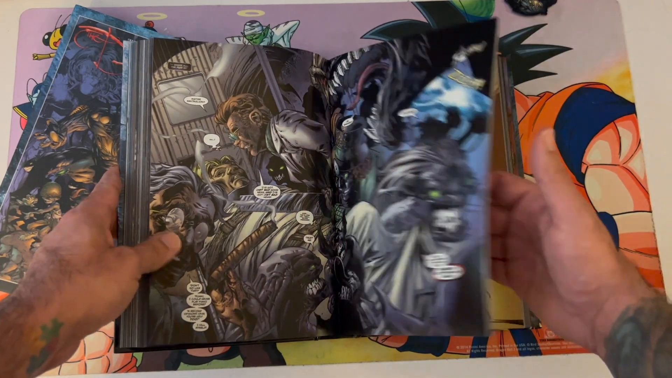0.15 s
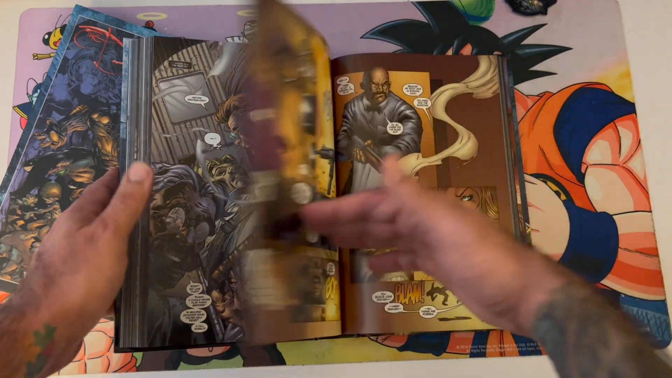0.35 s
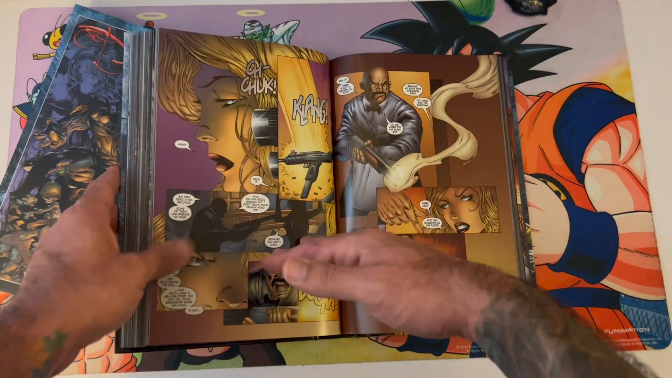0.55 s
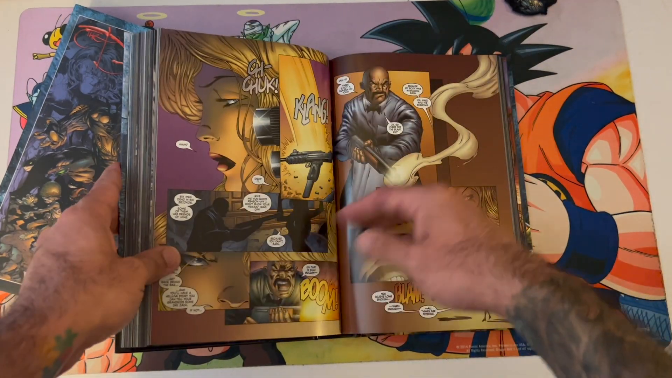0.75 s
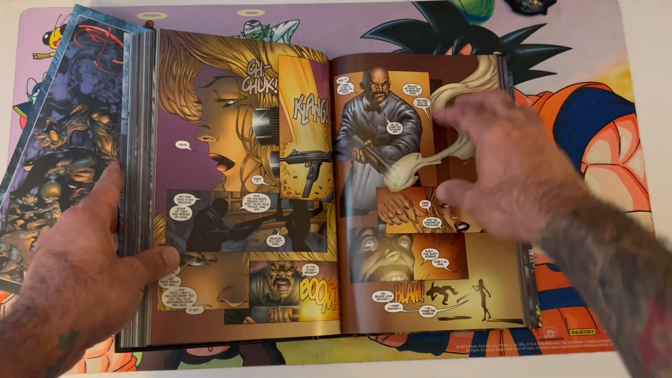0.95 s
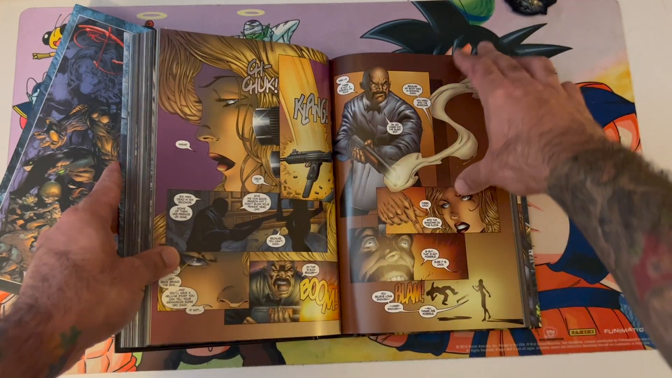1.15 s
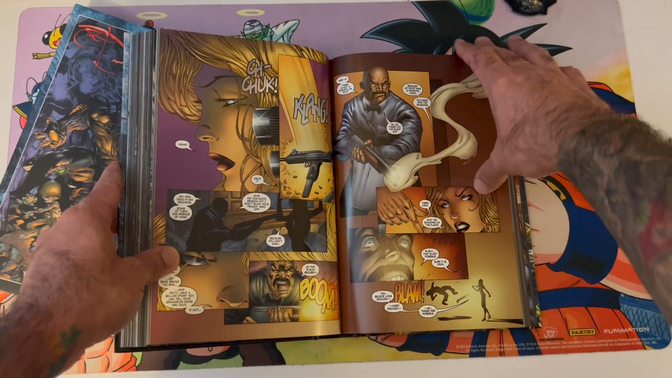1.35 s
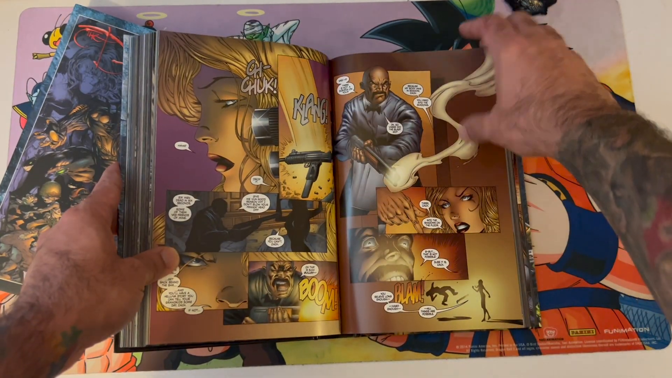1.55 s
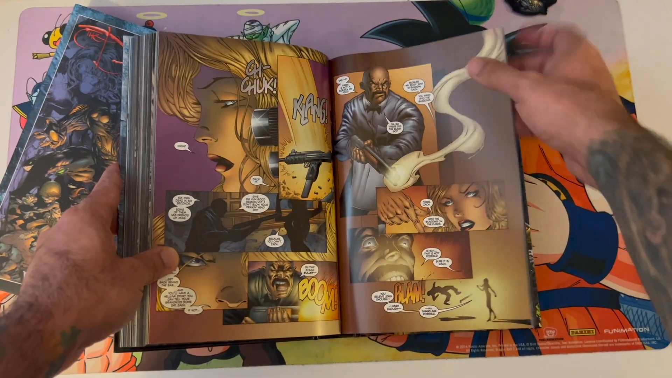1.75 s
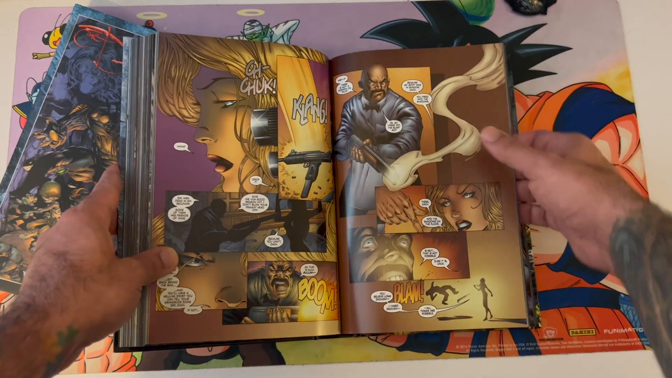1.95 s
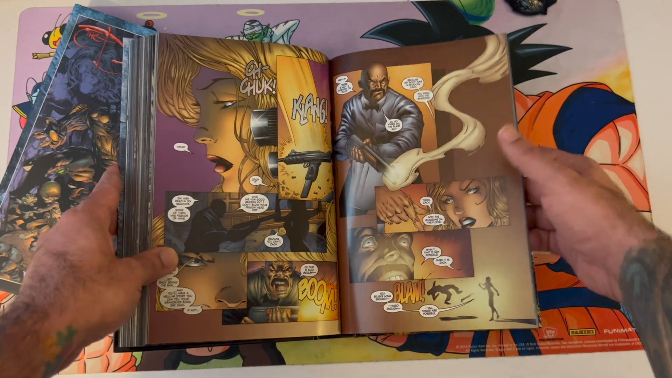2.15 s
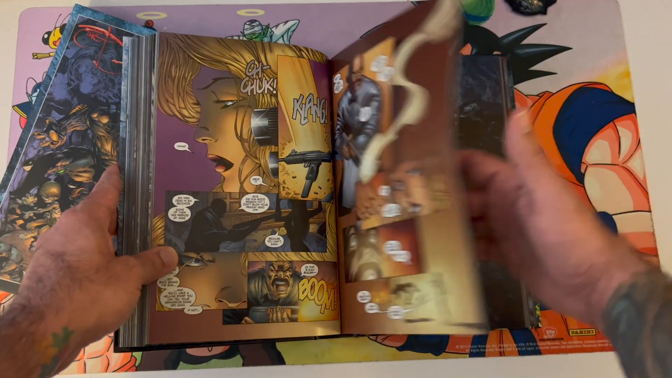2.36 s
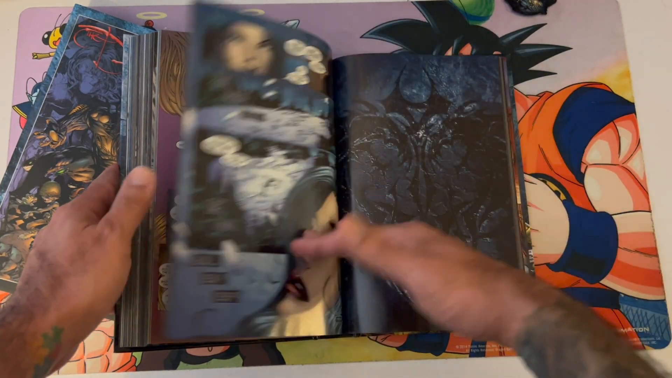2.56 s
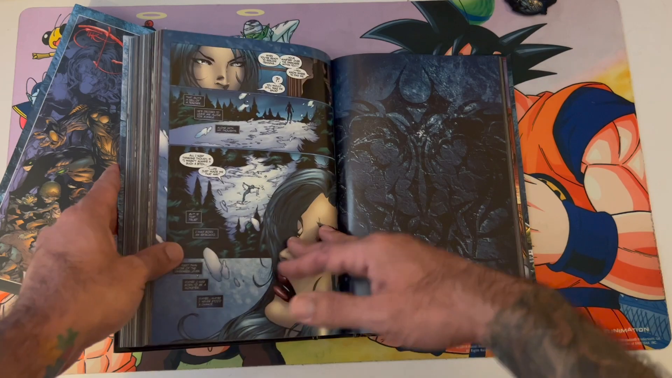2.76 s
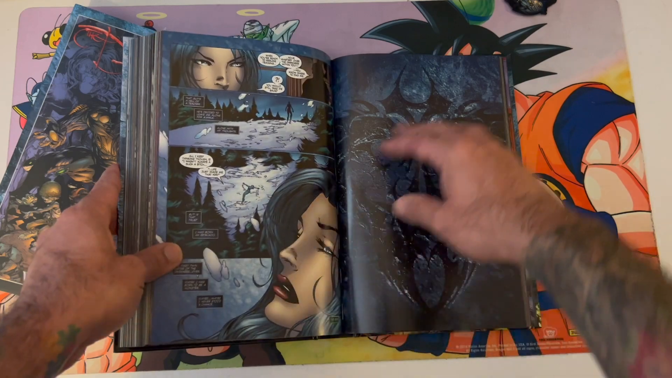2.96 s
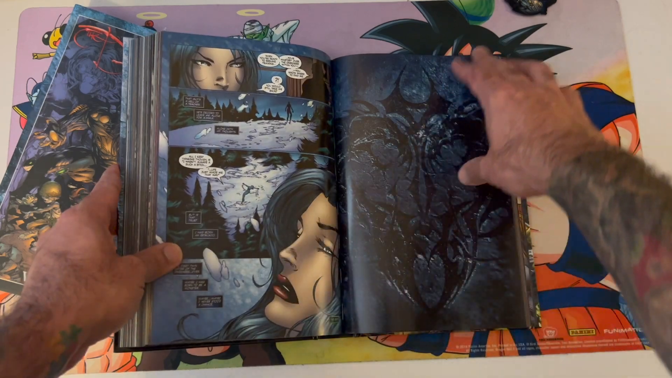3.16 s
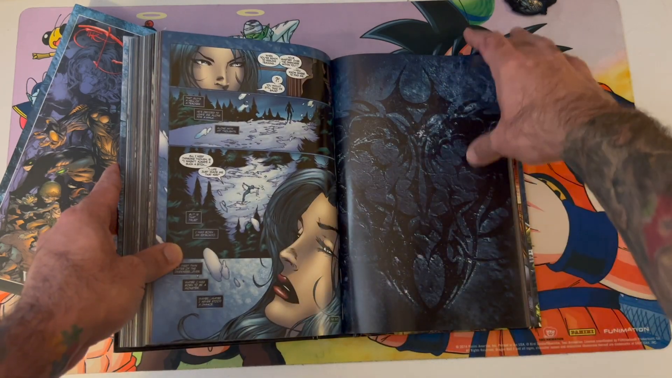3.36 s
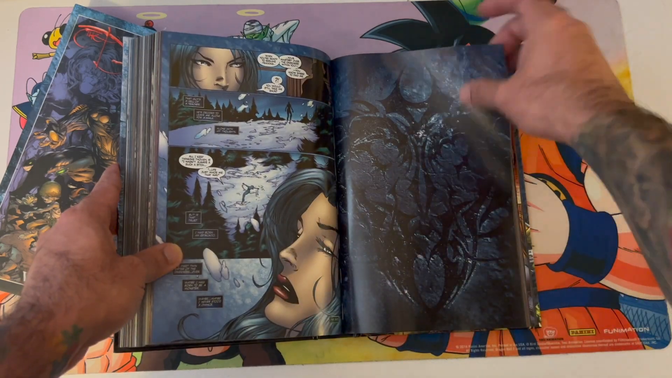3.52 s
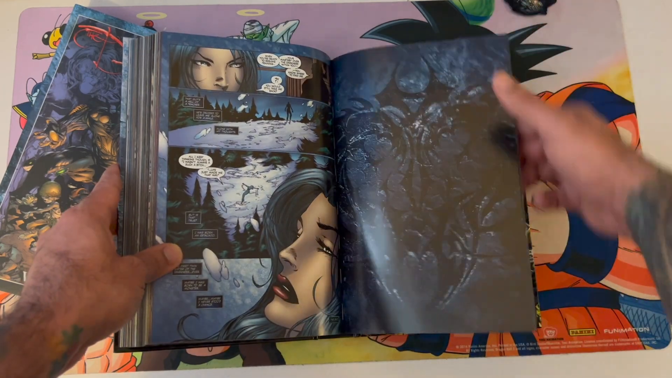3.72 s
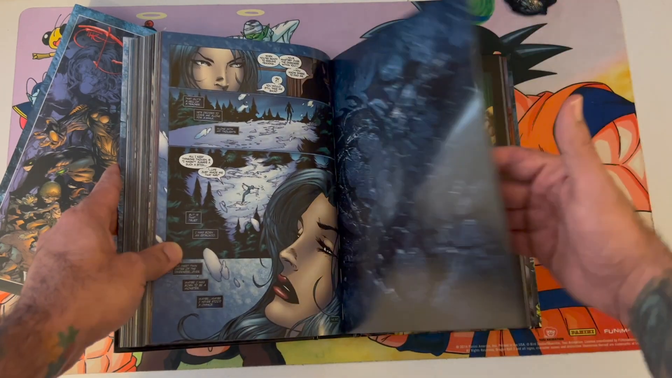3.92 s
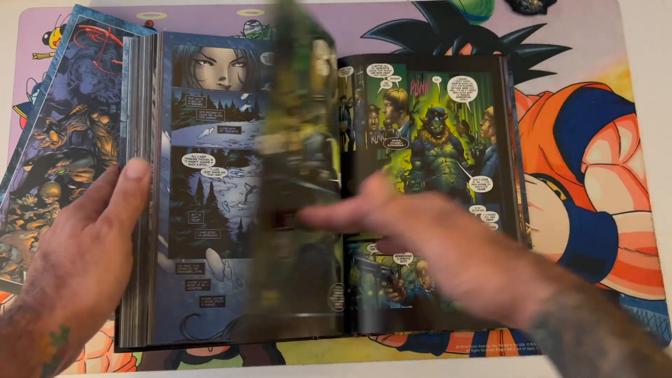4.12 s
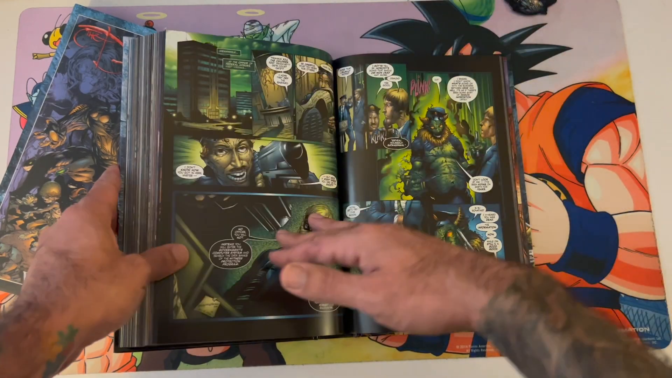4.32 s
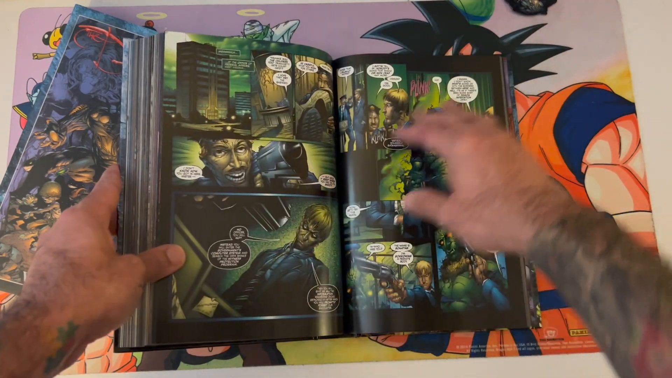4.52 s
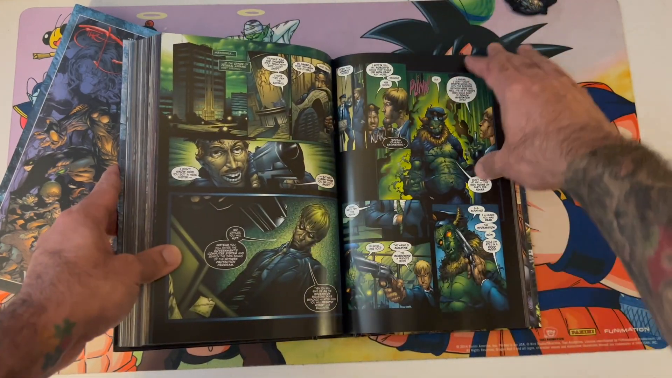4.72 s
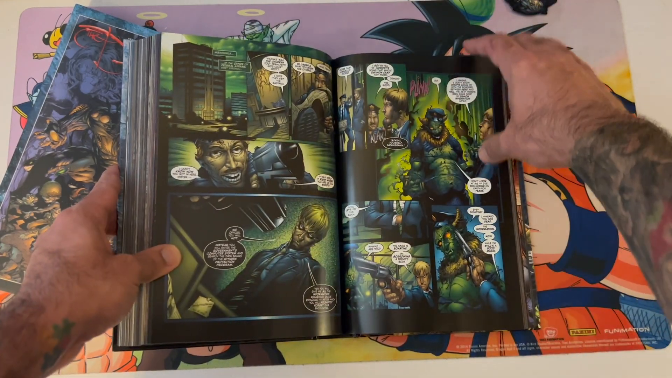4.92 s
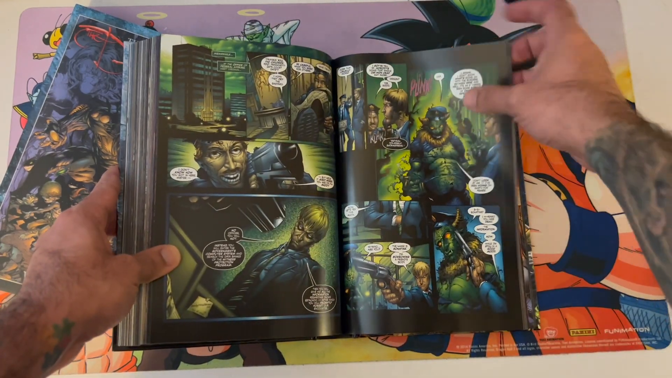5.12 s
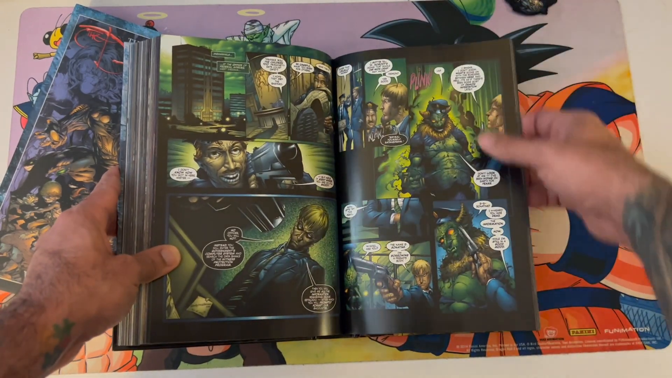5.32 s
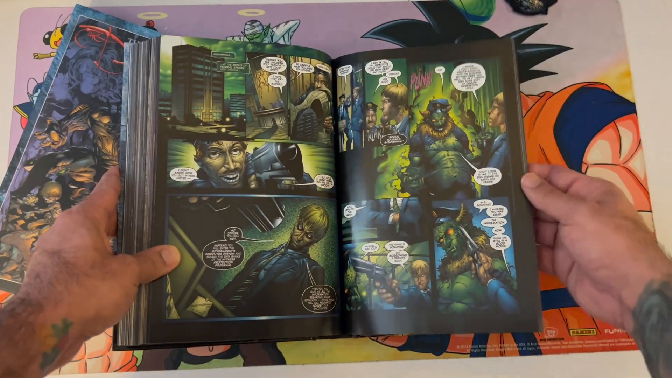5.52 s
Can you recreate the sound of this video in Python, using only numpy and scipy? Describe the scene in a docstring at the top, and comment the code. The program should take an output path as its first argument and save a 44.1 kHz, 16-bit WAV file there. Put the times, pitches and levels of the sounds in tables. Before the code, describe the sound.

Three glossy pages of a hardcover book are turned in a quiet room, with dull buckling pops, soft hand rubs and sharp slaps.

```python
"""Three glossy pages of a hardcover book are turned on a table in a small quiet room.
At once a hand rubs and the first sheet buckles in dull pops, with thumps by half a second.
More pops lead to a cluster of slaps near 2.6 s; a rasp at 3.65 s and pops lead to one hard slap at 4.2 s.
Slides, edge ticks and faint pops close it. Pops and slaps are dispersed bending waves, thumps are damped
modes, and the slides, ticks and swishes are shaped noise; a short room answers all but the slides."""
import sys
import numpy as np
from scipy import signal
from scipy.fft import rfft, irfft, next_fast_len
from scipy.io import wavfile
from scipy.ndimage import map_coordinates

SR = 44100
rng = np.random.default_rng(int(sys.argv[2]) if len(sys.argv) > 2 else 0)


def wav_record(signal):
    """Record a signal, one row per channel, as 16-bit PCM in the file named by sys.argv[1]."""
    frames = np.transpose(np.atleast_2d(signal))
    bounded = np.clip(frames, -1, 1)
    # unit amplitude maps onto the largest positive 16-bit level
    quanta = np.round(bounded * 32767).astype(np.int16)
    wavfile.write(sys.argv[1], SR, quanta)


N = 250558

# Spectrum of a buckling sheet, also used for the grit. Each row: frequency in Hz, relative level in dB per Hz.
BUCKLE_SPECTRUM = [(60, -3), (250, -6), (480, 3.5), (850, 4.5), (1100, -5), (1500, -4.5), (2200, -15),
                   (2900, -20), (4000, -32), (9000, -60), (16000, -86)]
# Spectrum of slipping page edges and paper skids. Each row: frequency in Hz, relative level in dB per Hz.
EDGE_SPECTRUM = [(200, -21.5), (1000, -2.5), (2000, 1), (3500, 0.5), (5500, -0.5), (8500, 4), (12000, -3),
                 (16000, -6)]


def amp(db):
    """Decibels to a linear gain."""
    return 10 ** (np.asarray(db) / 20)


def unit(x):
    """Scaled to rms 1."""
    return x / np.sqrt(np.mean(x ** 2) + 1e-20)


def along(points, hz):
    """Read a curve of (Hz, value) points on a log frequency axis."""
    f, v = np.transpose(points)
    return np.interp(np.log(hz + 1), np.log(f + 1), v)


def wobble(rate):
    """A smooth random curve with rate knots a second."""
    knots = rng.standard_normal(int(N * rate / SR) + 4)
    return map_coordinates(knots, [np.arange(N) * rate / SR])


def add(track, s, sound):
    """Mix a sound in at time s in seconds."""
    start = max(round(s * SR), 0)
    part = sound[..., :N - start]
    track[..., start:start + part.shape[-1]] += part


def tilted(spectrum, hz, tilt_db):
    """Gain of a spectrum with a tilt in dB per octave above 500 Hz."""
    return along(spectrum, hz) + tilt_db * np.log2(np.maximum(hz, 500))


def noise(spectrum, n, tilt_db=0, shift=1, ring_hz=1000, ring_db=0, ring_width=0.035, edge_hz=0):
    """Stereo noise of rms 1 with a tilt, one resonance, a low edge and a width that varies with frequency."""
    # Likeness of the two sides. Each row: frequency in Hz, likeness (1 is identical).
    likeness = [(60, 0.93), (300, .89), (700, 0.21), (2000, 0.68), (6000, 0.42), (14000, 1)]
    size = next_fast_len(n)
    hz = np.fft.rfftfreq(size, 1 / SR)
    resonance_db = ring_db / (1 + ((hz / ring_hz - 1) / ring_width) ** 2)
    tilt = tilt_db * np.log2(np.maximum(hz, 500))
    gain = amp(along(spectrum, hz / shift) + resonance_db + tilt)
    gain = gain / np.sqrt(1 + (edge_hz / (hz + 1)) ** 10)
    turn = np.arccos(along(likeness, hz)) / 2
    phases = np.exp(2j * np.pi * rng.random((2, len(hz))))
    mid, side = irfft(phases * gain * [np.cos(turn), np.sin(turn)], size)[:, :n]
    return unit(np.array([mid + side, mid - side]))


def burst(spectrum, rise, fall, size=4096, **colour):
    """Noise like a crowd of tiny paper snaps: it swells for rise seconds, then dies at 60 dB per fall seconds."""
    t = np.arange(size) / SR
    shape = np.minimum(t / rise, 1) ** 2 * amp(-60 * np.maximum(t - rise, 0) / fall)
    return unit(shape * noise(spectrum, size, **colour)) * np.sqrt(np.mean(shape ** 2))


def ring(modes):
    """Damped modes (Hz, dB, t60 in seconds), struck at slightly new strengths and pitches."""
    t = np.arange(SR // 2) / SR
    scatter_db, detune = 1.5, .012  # detune is a share of the pitch
    out = np.zeros(len(t))
    for hz, db, t60 in modes:
        decay = amp(db + scatter_db * rng.normal() - 60 * t / t60)
        out += decay * np.cos(2 * np.pi * hz * (1 + detune * rng.normal()) * t)
    return out


def bend(spectrum, glide_s, tilt_db, ring_hz, ring_db, ring_width=0.042, right_lag_s=.00006, size=4096):
    """A bending wave in the sheet, peak 1: treble arrives first and bass last, so the knock drops in pitch."""
    crease_hz, crease_cycles = 445, 0.18  # spacing and depth of the scatter from an uneven sheet
    hz = np.fft.rfftfreq(size, 1 / SR)
    gain = amp(tilted(spectrum, hz, tilt_db))
    resonance = 1 + (amp(ring_db) - 1) / (1 + 1j * (hz / ring_hz - 1) / ring_width)
    # this phase delays 1 kHz by glide_s, and lower pitches by more
    cycles = 2 * glide_s * np.sqrt(1000 * hz) + rng.random()
    cycles = cycles + crease_cycles * map_coordinates(rng.standard_normal(size), [hz / crease_hz])
    lag = right_lag_s * hz * np.array([[0], [1]])
    wave = irfft(gain * resonance * np.exp(-2j * np.pi * (cycles + lag)), size)[:, :size // 2]
    return wave / np.abs(wave).max()


def buckling(count=5):
    """The bent sheet gives way in a quick run of dull pops, each with its own ring pitch, and flutters on."""
    # Each row: start in seconds, relative level in dB, length of the run of pops in seconds,
    # centre of the ring pitches in Hz, tilt in dB per octave.
    buckles = [(.0685, -29.5, 0.0031, 1420, 6), (.076, -44, 0.0048, 1300, -6),
               (.119, -35, 0.0042, 1580, 2.5), (.126, -36.5, 0.0043, 1400, -11),
               (.136, -40.5, 0.0063, 1280, 0), (.280, -40, 0.0034, 1320, -4), (0.406, -42, .008, 1290, 2),
               (0.416, -33, 0.014, 1650, 1), (.444, -28.5, 0.0093, 1730, 1.5),
               (.451, -29.5, 0.012, 1070, 1), (.454, -32, 0.0067, 2560, 6), (.461, -39, 0.0053, 595, -12),
               (.471, -46, 0.01, 1400, -3), (.479, -35.5, 0.0057, 2600, 3), (.485, -40, .011, 1050, 1),
               (.506, -42, .012, 1200, -1), (.565, -46, 0.0069, 1070, 4), (1.612, -52, 0.0026, 2400, 13),
               (1.672, -45, .003, 1910, 8), (1.822, -49.5, .012, 1590, 8), (1.852, -51, 0.018, 1100, 2),
               (1.871, -43.5, .008, 1450, 5), (2.125, -55.5, 0.0034, 1400, 2),
               (2.271, -38.5, 0.0039, 1440, -1.5), (2.279, -39.5, 0.011, 1290, -13),
               (2.297, -46.5, 0.0092, 1440, -4), (2.423, -42, 0.0075, 1310, -11.5),
               (2.465, -44, .01, 1290, -15), (3.716, -44, .016, 1210, -2), (3.742, -45, .005, 1160, 4),
               (3.748, -35, 0.0047, 1160, 2.5), (3.756, -34.5, 0.0083, 1560, 3.5),
               (3.767, -42, 0.0052, 1160, 0), (3.834, -40.5, 0.0061, 1810, 1),
               (3.94, -39.5, .012, 1400, -10), (3.957, -46, .008, 2000, -6),
               (4.032, -34.5, 0.0079, 1280, -4), (4.069, -44.5, 0.0035, 1170, -2),
               (5.185, -50, 0.016, 1300, 4), (5.207, -45.5, .009, 1580, 2.5),
               (5.258, -47.5, 0.0094, 2060, 1.5), (5.654, -50.5, .005, 1420, 1)]
    glide_s, pop_ring_db = 0.002594, 10  # bending-wave delay at 1 kHz
    fade_db = 5  # drop in level across a run
    pitch_scatter = 0.16  # as a share of the ring pitch
    flutter_rise_s, flutter_fall_s, flutter_db = 0.01, 0.052, -17
    out = np.zeros((2, N))
    for s, db, length, ring_hz, tilt_db in buckles:
        for k in range(count):
            place = (k + rng.random()) / count
            pitch_hz = ring_hz * np.exp(pitch_scatter * rng.normal())
            gain = amp(db + fade_db * (.5 - place)) / np.sqrt(count)
            pop = bend(BUCKLE_SPECTRUM, glide_s, tilt_db, pitch_hz, pop_ring_db)
            add(out, s + place * length, gain * pop)
        flutter = burst(BUCKLE_SPECTRUM, flutter_rise_s, flutter_fall_s, tilt_db=tilt_db - 4)
        add(out, s, amp(db + flutter_db) * flutter)
    return out


def slapping():
    """The sheet smacks down on the stack, in one piece or in several quick contacts, as bending waves."""
    # Each row: start in seconds, relative level in dB, delay of the bending wave at 1 kHz in seconds,
    # tilt in dB per octave, ring in Hz, ring height in dB.
    slaps = [(2.592, -39, .003, 2.5, 1810, 20), (2.597, -29.5, .0035, 1, 1670, 26),
             (2.601, -28, .003, -1.5, 1460, 21), (2.607, -27.5, 0.002947, 4, 2940, 28),
             (2.616, -43, .003, 6, 2400, 22), (2.622, -42, .003, -1, 1780, 15),
             (2.636, -43, .003, 4, 2750, 20), (2.654, -48, .003, 3, 1560, 29),
             (4.2116, -19.5, 0.0062, -0.5, 5200, 9)]
    # Spectrum of a smack. Each row: frequency in Hz, relative level in dB per Hz.
    slap_spectrum = [(60, -25), (170, -6.5), (340, -6.5), (430, -4.5), (550, -14.5), (720, 3), (870, 0),
                     (1100, -10.5), (1700, -20), (3000, -21), (4500, -19.5), (8500, -23.5), (16000, -38)]
    out = np.zeros((2, N))
    for s, db, glide_s, tilt_db, ring_hz, ring_db in slaps:
        add(out, s, amp(db) * bend(slap_spectrum, glide_s, tilt_db, ring_hz, ring_db))
    return out


def thumping():
    """Blows on the block of pages: a soft one mostly wakes its low modes, and each squeezes out a puff of air."""
    # Each row: start in seconds, relative level in dB, hardness as a low-pass cutoff in Hz,
    # puff relative to the knock in dB.
    thumps = [(0.139, -44.5, 450, 0), (.298, -43, 219, -20), (.463, -39, 448, -10), (.482, -39.5, 330, -3),
              (1.831, -44.5, 250, -6), (2.31, -48, 197, -8), (2.608, -35.5, 460, -10),
              (2.879, -52, 303, -6), (3.58, -48.5, 403, -3), (3.75, -52, 397, -7), (4.048, -46, 300, -8),
              (4.221, -32, 450, -4.5), (4.475, -50, 221, -14)]
    # Modes of the book. Each row: frequency in Hz, relative level in dB, 60 dB decay time in seconds.
    book_modes = [(59.3, -18, 0.23), (112.5, -9.5, 0.17), (172, -9, 0.025), (330, 1, 0.055),
                  (410, -5, 0.051), (687, 5, 0.0081), (870, -15, 0.0055)]
    puff_hz = 69  # the cushion of air squeezed from under the sheet
    out = np.zeros(N)
    cycles = np.arange(SR // 10) / SR * puff_hz
    puff = np.sin(2 * np.pi * cycles) * 2 * cycles * np.exp(1 - 2 * cycles)
    for s, db, hard_hz, puff_db in thumps:
        add(out, s, amp(db + puff_db) * puff)
        softness = signal.butter(2, hard_hz, fs=SR)
        add(out, s, amp(db) * signal.lfilter(*softness, ring(book_modes)))
    lowest_hz = 55  # the book is too small to radiate deep bass
    out = signal.sosfilt(signal.butter(3, lowest_hz, "high", fs=SR, output="sos"), out)
    # pages land on the left, so the right side hears them later
    lag = round(.00014 * SR)
    return np.array([out, np.pad(out, (lag, 0))[:N]])


def swishing():
    """Paper skids on paper or skin in tiny jerks: ringing noise that is loudest as the two meet."""
    # Each row: moment of meeting in seconds, relative level in dB, rise in seconds, fall in seconds,
    # ring in Hz, ring height in dB, tilt in dB per octave.
    swishes = [(.49, -49.5, .03, 0.12, 12300, -7, 1), (.53, -61.5, .42, 1, 4180, 15, -8.5),
               (2.606, -33.5, .02, 0.024, 2050, 8.5, -11.5), (2.643, -45.5, 0.01, 0.11, 12200, 0, 11),
               (1.835, -57, 0.039, 0.28, 2800, 3, -4), (2.895, -58.5, 0.037, 0.09, 1960, 10, 1.5),
               (4.107, -47.5, 0.032, 0.2, 12000, 3, 1.5), (4.12, -39, 0.0066, 0.022, 1720, 5, -3),
               (4.219, -42, 0.0044, 0.053, 5040, -7, -6.5)]
    out = np.zeros((2, N))
    for s, db, rise, fall, ring_hz, ring_db, tilt_db in swishes:
        skid = burst(EDGE_SPECTRUM, rise, fall, size=40000, tilt_db=tilt_db,
                     ring_hz=ring_hz, ring_db=ring_db, ring_width=0.077)
        add(out, s - rise, amp(db) * skid)
    jerks = unit(amp(0.61 * wobble(700)))
    return out * jerks


def rasping():
    """A fingertip catches the page edge and scrapes along it in jerks: noise read ever slower sinks in pitch."""
    # Spectrum of the scrape. Each row: frequency in Hz, relative level in dB per Hz.
    rasp_spectrum = [(400, -21), (1300, -9.5), (2200, -6), (2900, -0.5), (4250, 5), (4800, -33),
                     (9000, -30), (16000, -26)]
    start_s, rasp_db, rasp_fall_s = 3.647, -54.5, 0.38
    catch_db, catch_rise_s, catch_fall_s = -31.5, .002, 0.018  # the catch that starts the rasp
    sag_per_s = 2.1  # exponential rate of the slowing
    out, t = np.zeros((2, N)), np.arange(SR // 4) / SR
    travel = np.cumsum(np.exp(-sag_per_s * t))
    scrape = np.array([map_coordinates(side, [travel]) for side in noise(rasp_spectrum, 2 * len(t))])
    jerks = unit(amp(2.5 * wobble(337)))[:len(t)]
    level = amp(catch_db - 60 * t / catch_fall_s) + jerks * amp(rasp_db - 60 * t / rasp_fall_s)
    add(out, start_s, np.minimum(t / catch_rise_s, 1) * level * scrape)
    return out


def ticking():
    """Page edges slip off a fingertip or off each other: short bright bursts with a slightly varied ring."""
    # Each row: start in seconds, relative level in dB, tilt in dB per octave.
    ticks = [(0.0365, -53, -5.5), (.161, -42, -5.5), (.343, -49.5, 18.5), (0.43, -46, 8), (.439, -43, 7),
             (.467, -40, 8), (0.487, -35.5, 9), (.494, -40, 8), (0.5213, -49, 0), (0.566, -44, 2),
             (1.613, -56, -4.5), (1.653, -51, -7), (1.6727, -43.5, -10), (1.678, -50, -14),
             (1.692, -56, -7), (1.831, -55, 0), (1.877, -49, -12), (2.425, -53, -3), (2.4723, -55, 1),
             (2.55, -43, 2.5), (2.575, -42.5, -3), (2.602, -30.5, -4.5), (2.607, -33, -13), (2.644, -42, 3),
             (2.652, -40.5, 5), (2.713, -46, 1.5), (3.05, -60, -5), (3.429, -44, 1), (3.559, -43.5, -11),
             (3.572, -33.5, 1.5), (3.6453, -38.5, 6), (3.726, -41, 11), (3.924, -45, -4.5),
             (3.931, -53, -3), (3.962, -57, -1), (3.974, -47, 2), (3.98, -40.5, 9), (3.988, -49, -2.5),
             (4.092, -45.5, -0.5), (4.098, -42.5, -3), (4.105, -40, 3), (4.116, -30.5, 2.5),
             (4.168, -43, 3.5), (4.2116, -24.5, 2), (4.317, -51, -3), (4.321, -44, -1),
             (4.847, -59.5, -4.5), (4.965, -43.5, 1), (4.9789, -39.5, -0.5), (4.989, -41.5, 0),
             (5.011, -42, 0.5), (5.045, -46.5, -10.5), (5.077, -45, 3), (5.0855, -40.5, 5.5),
             (5.118, -49.5, -6.5), (5.26, -49.5, -1)]
    rise_s, fall_s, centre_hz, ring_db = 0.0021, 0.0097, 5530, 7.5
    out = np.zeros((2, N))
    for s, db, tilt_db in ticks:
        ring_hz = centre_hz * np.exp(0.036 * rng.normal())
        tick = burst(EDGE_SPECTRUM, rise_s, fall_s, edge_hz=1420, tilt_db=tilt_db,
                     ring_hz=ring_hz, ring_db=ring_db)
        add(out, s, amp(db) * tick)
    return out


def sliding():
    """Skin and paper slide on coated paper: a grainy rub and a fine sheen follow each stroke's speed."""
    # Each row: fastest moment in seconds, rise in seconds, fall in seconds, relative rub level in dB,
    # relative sheen level in dB, low edge of the rub in Hz, hollow under the hand in Hz,
    # grit relative to the rub in dB.
    strokes = [(.03, 0.22, 0.31, -73, -100, 880, 1020, 7), (.48, 0.34, 0.37, -64, -78, 850, 3760, -4),
               (.775, 0.058, 0.41, -65.5, -63, 1830, 1760, 2),
               (1.41, 0.085, 0.68, -68.5, -77.5, 950, 7500, -23),
               (1.68, 0.063, 0.069, -62, -74, 1150, 2290, -1), (1.82, 0.27, 0.3, -60.5, -69, 810, 2600, -8),
               (2.2, 0.24, 0.21, -68, -77, 1010, 3030, 2), (2.43, 0.091, 0.11, -69.5, -65.5, 1490, 3700, 2),
               (2.64, .13, 0.12, -63, -64.5, 1190, 3330, 0),
               (2.9, 0.099, 0.084, -66, -62.5, 1740, 1940, -6),
               (3.05, 0.18, 0.19, -75, -67, 1800, 4160, -17),
               (3.46, 0.05, 0.16, -67, -71, 1670, 2520, 10.5),
               (3.61, 0.086, 0.35, -62, -58.5, 1580, 3670, -7), (3.971, 0.16, .2, -66, -65, 1000, 2800, 1),
               (4.251, 0.15, 0.088, -59.5, -62.5, 1390, 5340, -14),
               (4.53, 0.26, 0.26, -70.5, -60.5, 2570, 2660, -27),
               (4.849, 0.34, 0.3, -71, -85, 1830, 7700, -22), (5.01, 0.088, 0.26, -63, -68, 1070, 1970, -5),
               (5.24, 0.094, 0.078, -63, -69, 900, 2680, -3),
               (5.35, 0.2, 0.23, -65.5, -62.5, 1260, 2490, -6)]
    # Spectrum of the rub. Each row: frequency in Hz, relative level in dB per Hz.
    rub_spectrum = [(400, -3), (1000, 3.5), (1350, -7), (1800, -4.5), (2700, -5.5), (4000, -6), (5000, -5),
                    (7500, -5.5), (9000, -11.5), (11700, -59), (16000, -87)]
    # Spectrum of the sheen. Each row: frequency in Hz, relative level in dB per Hz.
    sheen_spectrum = [(4000, -16), (6500, -2.5), (8400, 5.5), (10300, -1.5), (12500, -1.5), (16000, -1)]
    drop_db, curve = 18.5, 1.68  # fall in level over one rise or fall time; roundness of the top
    # resonance of the gap between hand and page; half width as a share of its pitch
    hollow_db, hollow_width = 6.5, 0.082
    out, pressure = np.zeros((2, N)), np.zeros(N)
    grip = wobble(49) + 0.87 * wobble(16)  # the contact catches and lets go
    coarse = unit(amp(1.18 * grip + 0.88 * wobble(550)))
    fine = unit(amp(1.75 * grip + 1.4 * wobble(1200)))
    for s, rise, fall, rub_db, sheen_db, edge_hz, hollow_hz, grit_db in strokes:
        first = max(round((s - 2 * rise) * SR), 0)
        last = min(round((s + 2 * fall) * SR), N)
        span = np.arange(first, last)
        t = span / SR - s
        speed = amp(-drop_db * np.maximum(-t / rise, t / fall) ** curve)
        rub = noise(rub_spectrum, len(t), edge_hz=edge_hz,
                    ring_hz=hollow_hz, ring_db=hollow_db, ring_width=hollow_width)
        rub = amp(rub_db) * coarse[span] * rub
        sheen = amp(sheen_db) * fine[span] * noise(sheen_spectrum, len(t))
        out[:, span] += speed * (rub + sheen)
        pressure[span] += speed * amp(rub_db + grit_db)
    return amp(1.5) * (out + crackling(pressure))


def crackling(pressure, per_second=110, size_db=1, spread_db=3.2, lowest=2.6, highest=5.6, count=5):
    """Tiny catches of skin on paper, of several pitches, bigger as the rub grows louder and grittier."""
    out = np.zeros((2, N))
    for shift in np.geomspace(lowest, highest, count):
        catches = rng.random(N) < per_second / count / SR
        sizes = amp(size_db + spread_db * np.minimum(rng.exponential(size=N), 3))
        snap = burst(BUCKLE_SPECTRUM, 0.00053, 0.0031, size=512, shift=shift, tilt_db=0.5)
        out += signal.oaconvolve((catches * sizes * pressure)[None], snap, axes=1)[:, :N]
    return out


def dragging():
    """The block of pages rumbles softly under the moving hand: low noise with an unsteady level."""
    # Level of the rumble. Each row: time in seconds, relative level in dB.
    rumble_levels = [(0.0, -65), (0.4, -56.5), (0.88, -65), (1.25, -67.5), (1.8, -57.5), (2.07, -63.5),
                     (2.31, -66), (2.52, -57), (2.74, -65), (3.27, -70.5), (3.54, -62.5), (3.78, -60),
                     (4.11, -58), (4.42, -70), (4.78, -62.5), (4.93, -63.5), (5.06, -61.5), (5.68, -69)]
    # Spectrum of the rumble. Each row: frequency in Hz, relative level in dB per Hz.
    rumble_spectrum = [(25, -29), (45, -33), (70, 0), (200, 1), (350, -2.5), (650, -3.5), (1100, -24),
                       (2000, -60)]
    drag_db = np.interp(np.arange(N) / SR, *np.transpose(rumble_levels))
    return amp(drag_db + 1.64 * wobble(38)) * noise(rumble_spectrum, N)


def room(x, wet_db, modes_db):
    """A short diffuse tail, dying at its own rate in each band, and a few standing waves between the walls."""
    # Decay of the tail. Each row: frequency in Hz, 60 dB decay time in seconds.
    decay_times = [(100, 0.29), (500, 0.25), (2000, 0.18), (6000, 0.11), (15000, 0.12)]
    # Standing waves. Each row: frequency in Hz, relative level in dB, 60 dB decay time in seconds.
    standing_waves = [(113.3, -25, 0.2), (340, -6, 0.15), (423, -6, 0.2), (740, -7, 0.09), (930, -11, 0.16)]
    hz, t, z = signal.stft(noise([(20, 0), (20000, 0)], SR // 2), SR, nperseg=256)
    decay = amp(-60 * t / along(decay_times, hz)[:, None])
    tail = signal.istft(z * decay, SR, nperseg=256)[1]
    answer = amp(wet_db) * tail / np.linalg.norm(tail[0])
    add(answer, 0, amp(modes_db) * ring(standing_waves))
    first_wall = round(0.0028 * SR)
    return signal.fftconvolve(x, np.pad(answer, ((0, 0), (first_wall, 0))), axes=1)[:, :N]


def room_tone():
    """The quiet room itself: steady shaped noise."""
    # Spectrum of the quiet room. Each row: frequency in Hz, relative level in dB per Hz.
    floor_spectrum = [(20, -20), (38, -8.5), (58, 12), (85, -22), (200, -4.5), (350, -6.5), (580, -0.5),
                      (780, -17), (980, -6.5), (1250, -31), (1900, -25), (3000, -32.5), (9000, -36.5),
                      (16000, -46)]
    return amp(-66.5) * noise(floor_spectrum, N)


def scene():
    """The body of the book lies a little to the left, the page edges nearer the middle."""
    # left and right gains in dB
    body = (buckling() + thumping()) * amp([[1.6], [-1.6]]) + slapping() * amp([[2.3], [-2.3]])
    edges = ticking() * amp([[.6], [-.6]]) + (swishing() + rasping()) * amp([[1.3], [-1.3]])
    steady = (sliding() + dragging() + room_tone()) * amp([[.8], [-.8]])
    body_room = room(body, wet_db=-8.5, modes_db=-66)
    edges_room = room(edges, wet_db=-6.0, modes_db=-75)
    return body + body_room + edges + edges_room + steady


def record(dry, low_cut_hz=42):
    """The microphone sheds deep bass, colours the treble and stops at its band limit; its left port leads."""
    # Response of the microphone. Each row: frequency in Hz, gain in dB.
    response = [(8800, -0.5), (9450, -4), (9900, -18.5), (10600, -12), (11200, 3), (12700, 2.5),
                (13500, -33), (14200, -19), (14900, 10.5), (16500, -19)]
    top_hz, left_lead_s = 16500, .000018
    thinned = signal.sosfilt(signal.butter(3, low_cut_hz, "high", fs=SR, output="sos"), dry)
    size = next_fast_len(N + SR // 10)
    hz = np.fft.rfftfreq(size, 1 / SR)
    # half the lead advances the left, half delays the right
    ports = np.exp(1j * np.pi * hz * left_lead_s * np.array([[1], [-1]]))
    gain = amp(along(response, hz)) * (hz < top_hz)
    return irfft(rfft(thinned, size) * ports * gain, size)[:, :N]


dry = scene()
out = record(dry)
wav_record(out)
```